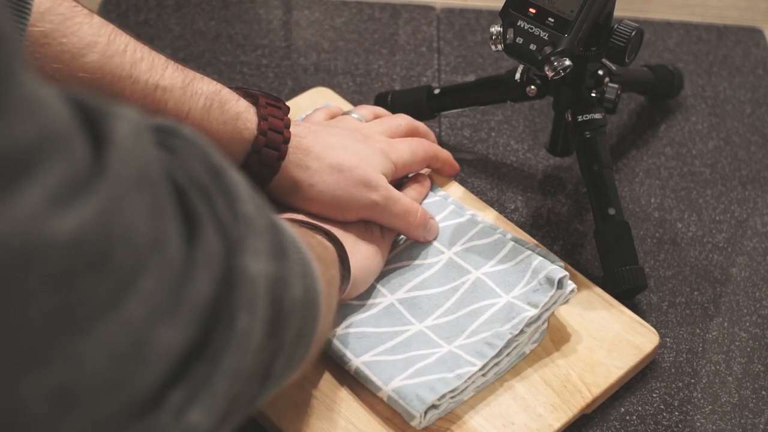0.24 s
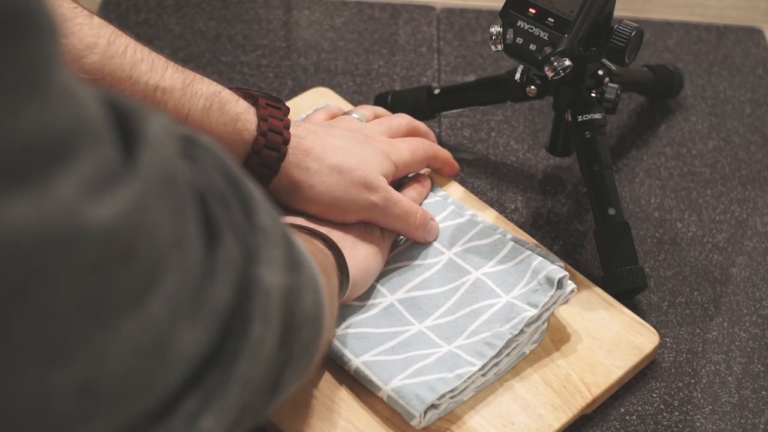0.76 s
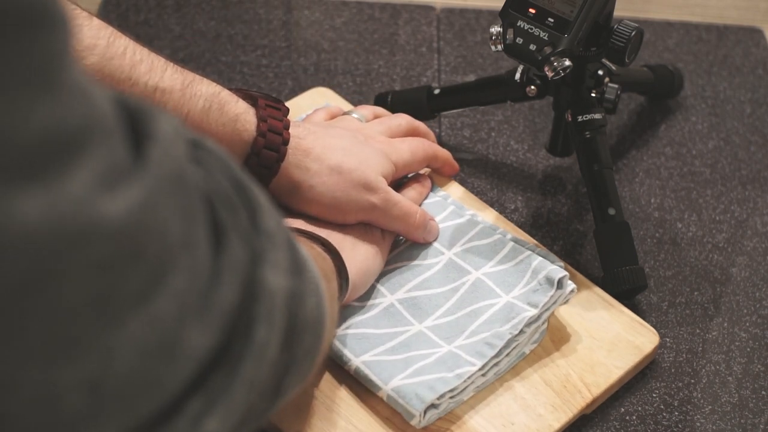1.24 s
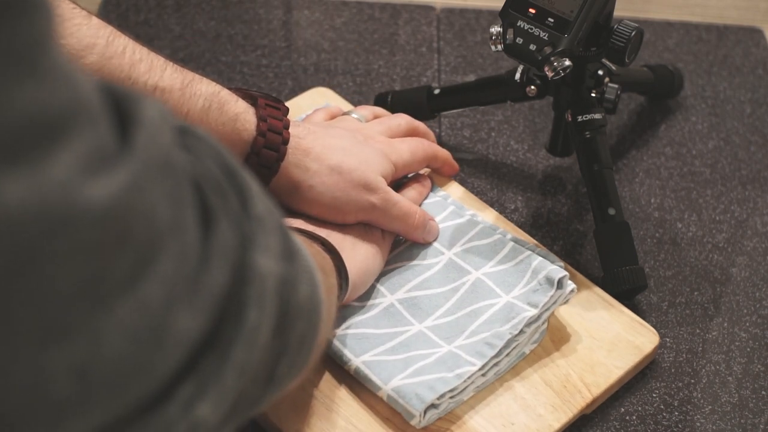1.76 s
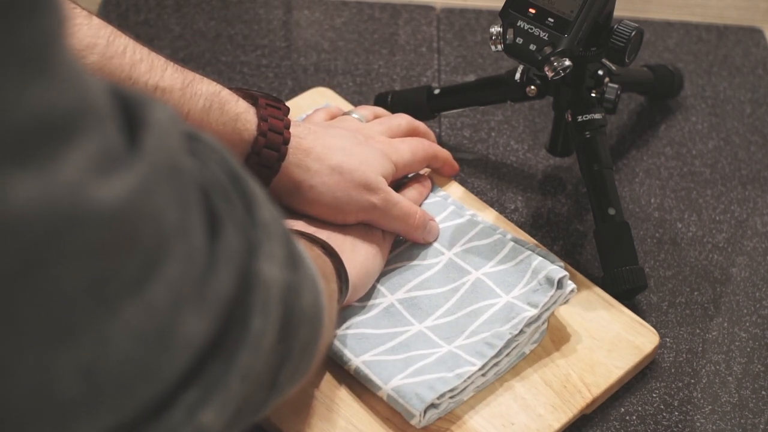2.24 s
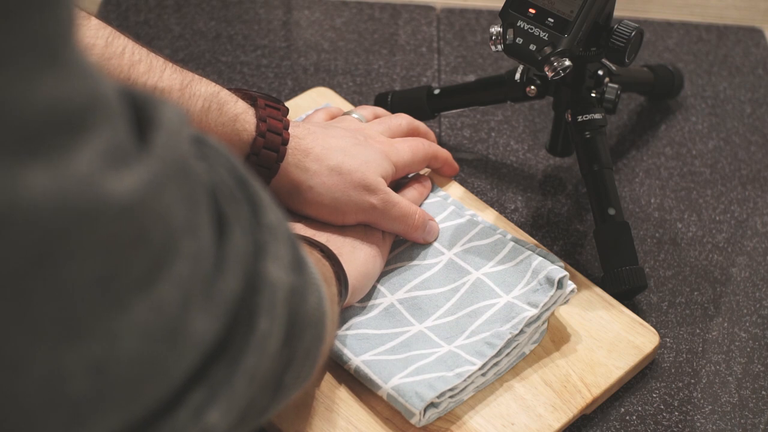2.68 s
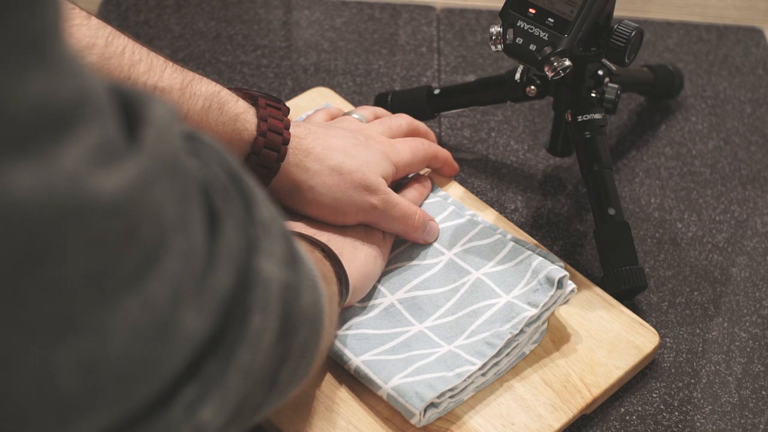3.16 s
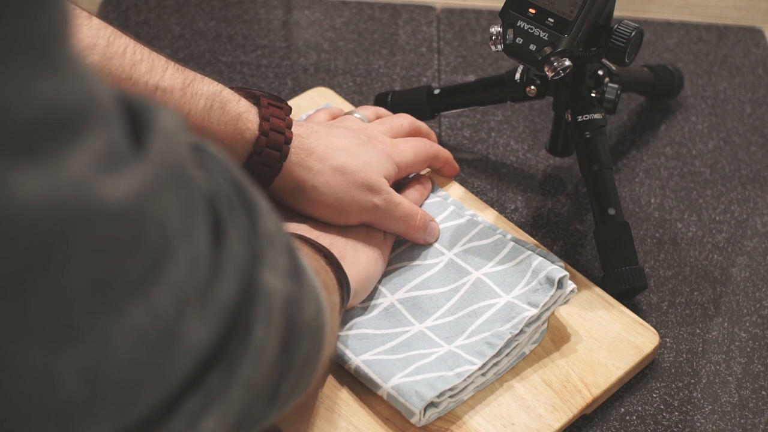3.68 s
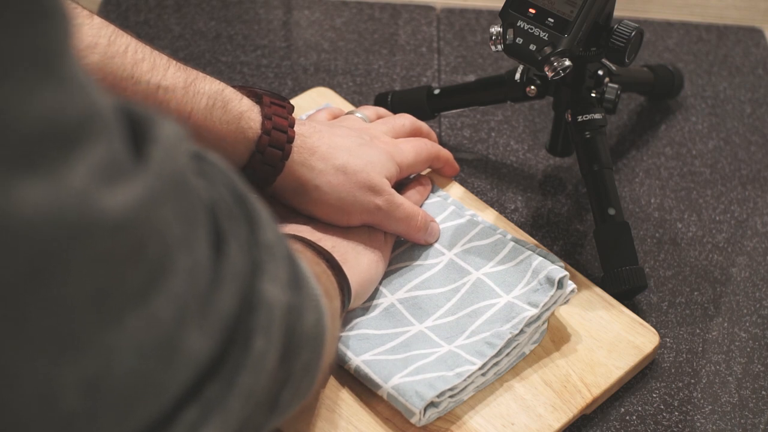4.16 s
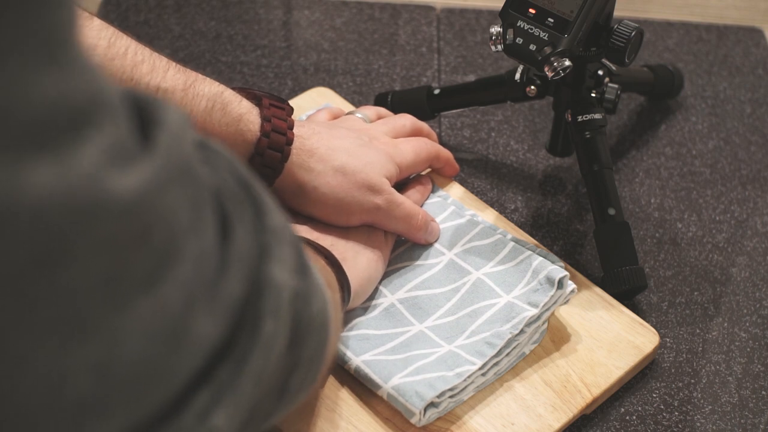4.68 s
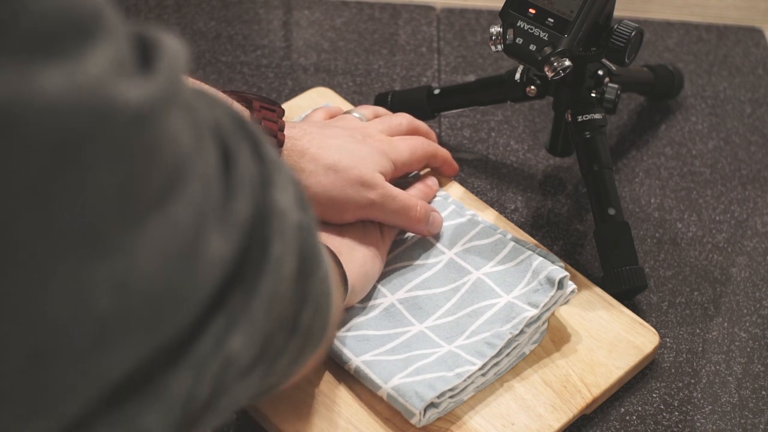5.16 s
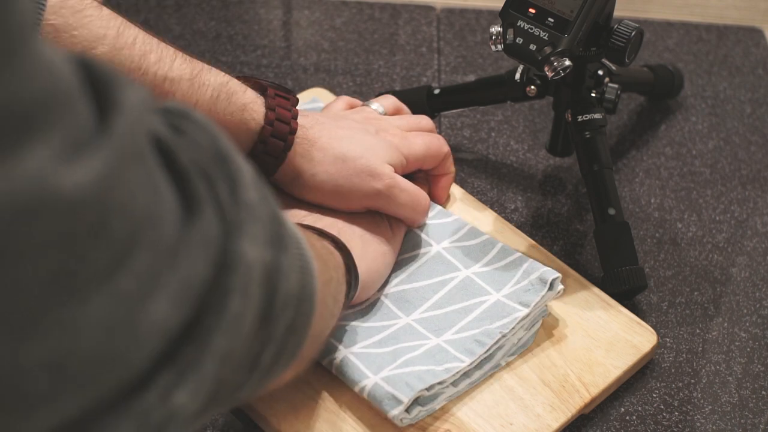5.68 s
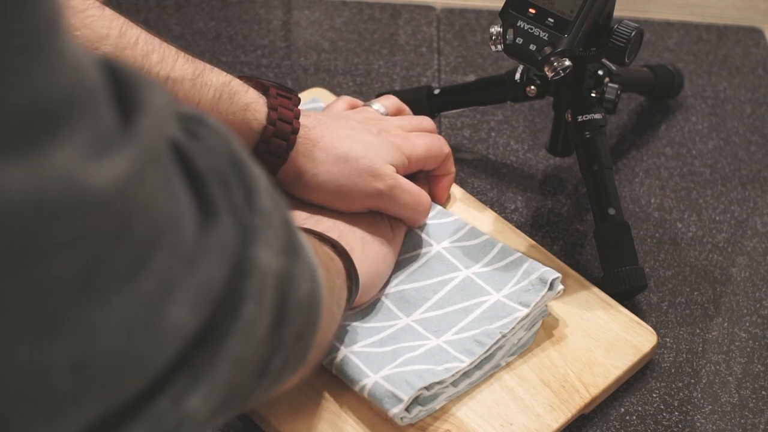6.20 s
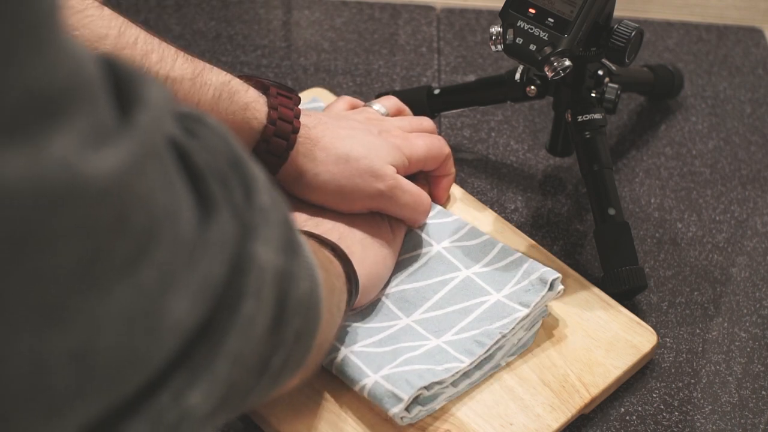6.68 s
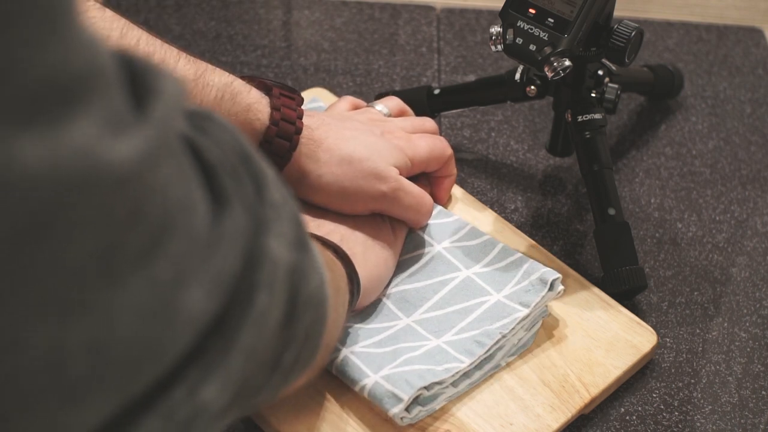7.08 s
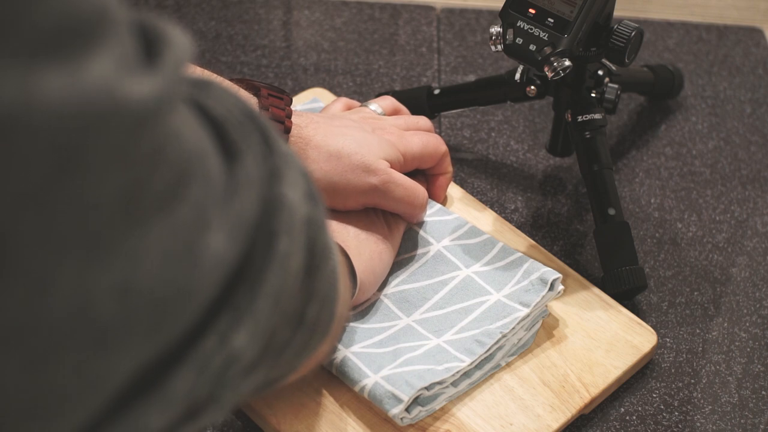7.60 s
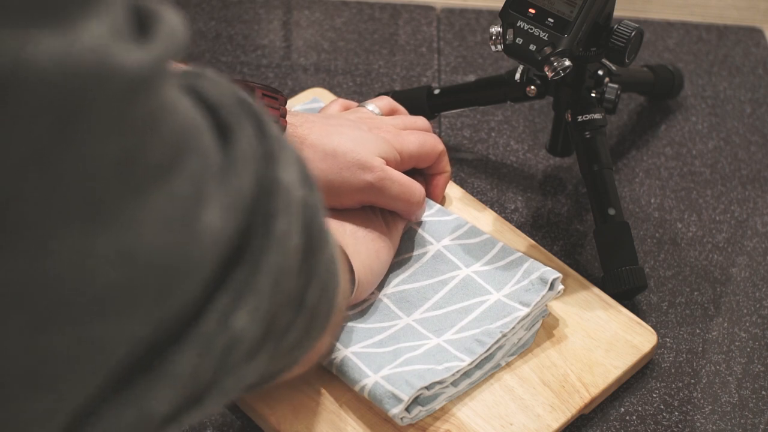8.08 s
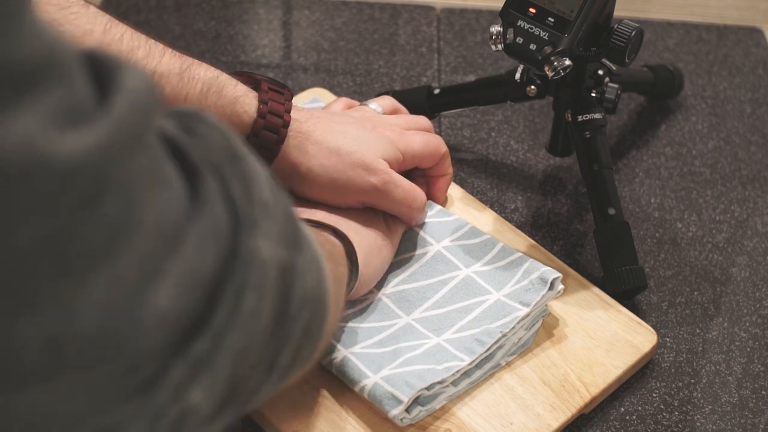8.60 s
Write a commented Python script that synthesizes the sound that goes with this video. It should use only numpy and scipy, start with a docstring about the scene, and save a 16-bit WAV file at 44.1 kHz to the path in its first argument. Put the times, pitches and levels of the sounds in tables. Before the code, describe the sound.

Close, brittle cracks of dry pasta breaking under hands on a wooden board, with dull thumps and faint cloth rustle.

```python
"""Dry pasta snapped in a towel

Two hands lean on a wooden board, close by, and break dry pasta inside a folded towel. Each break is a
sharp crack with ringing shards; the released hands knock the board and thump the table under it.
Between breaks the towel rustles and faint tones droop. A small room answers; rumble and hiss lie below."""
import sys
import numpy as np
from scipy import signal
from scipy.fft import rfft, irfft, next_fast_len
from scipy.io import wavfile
from scipy.ndimage import uniform_filter1d

SR = 44100
rng = np.random.default_rng(int(sys.argv[2]) if len(sys.argv) > 2 else 0)


def master_out(mix):
    """Clip the mix to full scale and print it as 16-bit PCM to the path in sys.argv[1]."""
    frames = np.transpose(np.atleast_2d(mix))
    ceiling = np.clip(frames, -1, 1)
    pcm = np.round(ceiling * 32767).astype(np.int16)
    wavfile.write(sys.argv[1], SR, pcm)


N = 390285
RING_SAMPLES, ATTACK_SAMPLES = int(0.6 * SR), int(0.01 * SR)
LEAN_S = 5.4  # the hands regrip and lean in for the second round

# Pasta breaks and one soft knock of a settling hand.
# Each row: start in seconds, crack, fizz and knock levels in dB before trim,
# knock hardness in dB per octave, ring of the piece in Hz, ring of the splinters in Hz.
IMPACTS = [(0.903, -33, -38, -38.5, 2.5, 2220, 7900), (0.9503, -36, -38.5, -40.5, 5, 4740, 7700),
           (0.972, -31, -39, -25.5, -3.5, 2240, 12300), (2.5167, -46, -42.5, -54, 7.5, 4740, 12200),
           (2.608, -31, -28, -14.5, -3.5, 1920, 12000), (3.5146, -54, -48.5, -69, 11.5, 5070, 12000),
           (3.7047, -32.5, -38, -33, 16.5, 1900, 10600), (3.72, -33, -42, -28, 8.5, 1900, 7500),
           (6.1916, -54.5, -49, -64.5, 10, 5050, 7500), (6.476, -27.5, -28, -19, 6.5, 2162, 10400),
           (6.6315, -43.5, -44.5, -43, 7, 4310, 10600), (6.7865, -74.5, -73.5, -61, -1.5, 1900, 8000),
           (7.0407, -24.5, -24, -17.5, 6, 2080, 11580), (7.0604, -25.5, -29.5, -20.5, 8, 2100, 11500),
           (7.0683, -32.5, -29.5, -16.5, 9.5, 1900, 11500), (7.2267, -48, -44, -63, 15, 3510, 11000),
           (7.347, -53.5, -49.5, -57, 12, 2090, 12900), (7.5432, -32.5, -36, -36.5, 10.5, 1985, 7600),
           (7.6312, -31, -33.5, -24, 4.5, 1860, 9200), (7.7231, -27, -27, -15.5, -5, 4560, 9740),
           (8.12, -76.5, -74, -69.5, 15, 2615, 7500)]


def undb(db):
    """Decibels to gain."""
    return 10 ** (np.asarray(db) / 20)


def unit(x, count=None):
    """Scale to rms 1 over the first count samples."""
    return x / np.sqrt(np.mean(x[:count] ** 2))


def colour(x, points):
    """Minimum-phase filter through (Hz, dB) points."""
    size = 2 * next_fast_len(len(x))
    hz, db = np.transpose(points)
    bin_hz = np.arange(size // 2 + 1) * SR / size
    gain = undb(np.interp(np.log(bin_hz + 1), np.log(hz), db))
    cepstrum = irfft(np.log(gain))
    cepstrum[1:size // 2] *= 2
    cepstrum[size // 2 + 1:] = 0
    return irfft(rfft(x, size) * np.exp(rfft(cepstrum)))[:len(x)]


def fade(t60_s, count=RING_SAMPLES):
    """Exponential decay, 60 dB down at t60_s."""
    return np.exp(-np.log(1000) * np.arange(count) / SR / t60_s)


def ring(modes, count=RING_SAMPLES):
    """Struck modes (Hz, dB, t60 s): the real part starts at full swing, the imaginary part at rest."""
    t = np.arange(count) / SR
    return sum(undb(db) * fade(t60_s, count) * np.exp(2j * np.pi * hz * t) for hz, db, t60_s in modes)


def walk(rate_hz):
    """Smooth random wander, rms 1."""
    hold = int(SR / rate_hz)
    steps = np.repeat(rng.standard_normal(N // hold + 1), hold)
    return unit(uniform_filter1d(uniform_filter1d(steps, hold), hold)[:N])


def ramp(start_s, rise_s):
    """Linear rise from 0 to 1."""
    return np.clip((np.arange(N) / SR - start_s) / rise_s, 0, 1)


def swell(start_s, attack_s, hold_s, release_s):
    """Linear envelope, released hold_s after its start."""
    return ramp(start_s, attack_s) * (1 - ramp(start_s + hold_s, release_s))


def add(track, start_s, sound):
    """Mix a sound into the track."""
    start = int(start_s * SR)
    track[start:start + len(sound)] += sound[:N - start]


def background(waver_db=2.5, hiss_db=-79, hiss_rise_db=3):
    """Table and room rumble under a white hiss that rises a little from LEAN_S on."""
    # Rumble spectrum. Each row: frequency in Hz, gain in dB.
    spectrum = [(12, -18.5), (22, -1), (48, 2.5), (78, -8.5), (115, -10.5), (160, -29), (205, -30),
                (250, -22), (330, -36.5), (430, -34.5), (700, -40), (2000, -48.5), (16000, -80)]
    # Rumble contour. Each row: time in seconds, level in dB.
    contour = [(0, -58.5), (2.3, -60), (3.2, -54.5), (3.6, -60), (4.7, -59), (7.2, -51), (8.85, -52.5)]
    rumble = unit(colour(rng.standard_normal(N), spectrum))
    rumble_db = np.interp(np.arange(N) / SR, *np.transpose(contour)) + waver_db * walk(8.2)
    hiss = undb(hiss_db + hiss_rise_db * ramp(LEAN_S, rise_s=0.28)) * rng.standard_normal(N)
    return undb(rumble_db) * rumble + hiss


def towel(rest_db=-94.5, grain_db=5, catch_db=2, crunches_per_s=12, over_rub_db=5.5, scatter_db=2.3):
    """Fibres catch and slip unevenly; now and then the pasta shifts with a short crunch."""
    # Cloth spectrum. Each row: frequency in Hz, gain in dB.
    spectrum = [(150, -11), (300, -2.5), (650, 4.5), (850, -7), (1150, 0.5), (1750, -4.5), (2800, -4.5),
                (3800, -8.5), (5000, -20), (16000, -30.5)]
    # Hands sliding on the towel. Each row: start in seconds, hold in seconds, level in dB.
    rubs = [(0.202, .12, -85), (4.96, 0.029, -77), (5.577, .7, -82), (6.891, .13, -87.5),
            (8.43, 0.46, -73.5)]
    # Clearest shifts of the pasta. Each row: start in seconds, level in dB.
    crunches = [(0.278, -67), (.331, -72.5), (.443, -70), (.563, -70), (0.589, -72), (.808, -72.5),
                (2.286, -69.5), (3.467, -70), (5.51, -69), (5.601, -69), (5.677, -70), (5.897, -70.5),
                (6.095, -65), (6.113, -64.5), (6.158, -68), (6.961, -67), (6.986, -66), (7.016, -66.5),
                (8.542, -68)]
    grains = rng.standard_normal(N) * undb(grain_db * rng.exponential(size=N).clip(0, 6))
    sliding = sum(undb(db) * swell(start_s, 0.018, hold_s, 0.13) for start_s, hold_s, db in rubs)
    friction = (undb(rest_db) + sliding) * undb(catch_db * walk(55))
    triggers = rng.random(N) < crunches_per_s / SR
    shifts = triggers * sliding * undb(over_rub_db + scatter_db * rng.standard_normal(N))
    for start_s, db in crunches:
        add(shifts, start_s, undb([db]))
    crunch_shape = swell(0, attack_s=0.0038, hold_s=0.0088, release_s=0.018)[:RING_SAMPLES]
    crunching = signal.fftconvolve(shifts, crunch_shape)[:N]
    return unit(colour(grains, spectrum)) * (friction + crunching)


def fracture(spectrum, ring_hz, ring_db, ring_q, tear_t60_s, splinter_t60_s, splinter_db,
             shard_t60_s, shard_count, shard_db=-5.5):
    """The crack tears through at once, splinters follow, and freed shards ring briefly in the cloth."""
    size = 8 * ATTACK_SAMPLES
    tear = rng.standard_normal(size) * fade(tear_t60_s, size)
    grains = rng.standard_normal(size) * undb(5 * rng.exponential(size=size).clip(0, 4))
    splinters = grains * fade(splinter_t60_s, size)
    shard_hz = rng.uniform(1800, 14000, (shard_count, 1))
    shard_tones = np.sin(2 * np.pi * shard_hz * np.arange(size) / SR)
    shards = rng.standard_normal(shard_count) @ shard_tones * fade(shard_t60_s, size)
    parts = ((tear, 0), (splinters, splinter_db), (shards, shard_db))
    burst = sum(undb(db) * unit(colour(part, spectrum), ATTACK_SAMPLES) for part, db in parts)
    # the size of the piece sets one well damped resonance
    resonance = signal.lfilter(*signal.iirpeak(ring_hz, ring_q, fs=SR), burst)
    return unit(burst + undb(ring_db) * resonance, ATTACK_SAMPLES)


def board_knock(hardness_db_per_octave, detune=0.022, scatter_db=3, contact_s=0.00026):
    """The broken piece is driven onto the board; hard contact favours the high modes."""
    # Board modes, damped by the hands. Each row: frequency in Hz, level in dB, t60 in seconds.
    board_modes = [(257, -17, 0.18), (337, -17, 0.076), (418.5, -18.5, 0.086), (557, -17.5, 0.059),
                   (716, 2.5, 0.032), (725, -10, 0.036), (1002, -9.5, 0.04), (1127, -11, 0.034),
                   (1212, -7.5, 0.028), (1420, -16.5, 0.026), (1680, -24, .03), (2103, -21, 0.05)]
    size = RING_SAMPLES // 4
    hz, db, t60_s = np.transpose(board_modes)
    octaves_up = np.clip(np.log2(hz / hz[np.argmax(db)]), 0, 1)
    struck_hz = hz * (1 + detune * rng.standard_normal(len(hz)))
    struck_db = db + hardness_db_per_octave * octaves_up + scatter_db * rng.standard_normal(len(hz))
    onset = 1 - np.exp(-np.arange(size) / SR / contact_s)
    return unit(ring(zip(struck_hz, struck_db, t60_s), size).imag * onset, ATTACK_SAMPLES)


def pasta(fizz_trim_db=-1.5, knock_trim_db=1):
    """Every break cracks, splinters and knocks the board, as heard from one direction."""
    # Spectra of the crack and the splinter fizz. Each row: frequency in Hz, gain in dB.
    crack_spectrum = [(300, -26), (900, -5.5), (1600, -3), (2140, -3.5), (2700, -2.5), (4200, -3),
                      (5500, -4), (6700, -7.5), (8000, -17), (16000, -37.5)]
    fizz_spectrum = [(1000, -36.5), (5500, -15.5), (7500, -2.5), (9500, -3), (12200, -1.5), (14000, -5),
                     (16000, -14.5)]
    out = np.zeros(N)
    for start_s, crack_db, fizz_db, knock_db, hardness, piece_hz, splinter_hz in IMPACTS:
        crack = fracture(crack_spectrum, piece_hz, ring_db=-0.5, ring_q=3.2, tear_t60_s=0.0052,
                         splinter_t60_s=0.049, splinter_db=5.5, shard_t60_s=0.028, shard_count=32)
        fizz = fracture(fizz_spectrum, splinter_hz, ring_db=1.5, ring_q=7, tear_t60_s=0.0025,
                        splinter_t60_s=0.037, splinter_db=3, shard_t60_s=0.025, shard_count=24)
        add(out, start_s, undb(crack_db) * crack)
        add(out, start_s, undb(fizz_db + fizz_trim_db) * fizz)
        add(out, start_s, undb(knock_db + knock_trim_db) * board_knock(hardness))
    return out


def thump(scatter_db=2.5, contact_s=0.003):
    """The weight of the hands shakes the table; flesh and towel soften the blow."""
    # Table top modes. Each row: frequency in Hz, level in dB, t60 in seconds.
    table_modes = [(50.1, -4, 0.38), (57.4, -9.5, 0.39), (76.6, 3, 0.14), (87.8, -9.5, .3),
                   (108.6, -11, 0.35), (135, -12, .3), (186.6, -27.5, 0.46), (247.5, -13.5, .16),
                   (264.6, -12.5, 0.12)]
    modes = [(hz, db + scatter_db * rng.standard_normal(), t60_s) for hz, db, t60_s in table_modes]
    onset = 1 - np.exp(-np.arange(RING_SAMPLES) / SR / contact_s)
    return unit(ring(modes).real * onset, 3 * ATTACK_SAMPLES)


def table_thumps(offset_db=-2.5, follow_db_per_db=0.27, lean_db=-4.5):
    """Each impact thumps the table: more when the hands follow through, less once they lean on it."""
    # Soft table thumps as the hands shift their weight. Each row: start in seconds, level in dB.
    bumps = [(2.3, -60), (3.1, -52), (6.787, -47), (7.971, -57)]
    out = np.zeros(N)
    for start_s, crack_db, _, knock_db, *_ in IMPACTS:
        follow_db = follow_db_per_db * (knock_db - crack_db)
        thump_db = knock_db + offset_db + follow_db + lean_db * (start_s > LEAN_S)
        add(out, start_s, undb(thump_db) * thump())
    for start_s, db in bumps:
        add(out, start_s, undb(db) * thump())
    return out


def whines(droop=0.04, waver=0.008, flutter_db=2):
    """Faint tones that swell quickly, waver and sink a little as they fade."""
    # Hums and whines. Each row: start in seconds, length in seconds, pitch in Hz, level in dB.
    tones = [(1.301, 0.32, 250.4, -76), (3.07, 0.12, 419, -76), (3.102, 0.28, 251.8, -67.5),
             (5.079, 0.59, 726.6, -83.5), (5.181, 0.31, 522, -72), (8.329, 0.36, 533, -77)]
    out, wander, flutter = np.zeros(N), walk(63), walk(45)
    for start_s, length_s, hz, db in tones:
        start, count = int(start_s * SR), int(length_s * SR)
        age = np.linspace(0, 1, count)
        pitch_hz = hz * (1 - droop * age + waver * wander[start:start + count])
        envelope = np.sin(np.pi * np.sqrt(age)) * undb(db + flutter_db * flutter[start:start + count])
        add(out, start_s, np.sqrt(2) * envelope * np.sin(2 * np.pi * np.cumsum(pitch_hz) / SR))
    return out


def room(x, gap_s=0.0005, build_s=0.003):
    """Diffuse echoes of a small room; the treble dies first."""
    # Echo bands. Each row: frequency in Hz, level in dB.
    bands = [(100, -18), (250, -9.5), (450, -4.5), (600, -9), (720, -14), (920, -5), (1220, -8), (1550, -6),
             (2100, -9), (4000, -9.5), (8000, -10), (12000, -13), (16000, -10.5)]
    # Echo decay. Each row: frequency in Hz, t60 in seconds.
    decay = [(100, .34), (700, .36), (1400, .36), (2500, .33), (6000, .3), (11000, .22), (16000, .15)]
    hz, db = np.transpose(bands)
    t60_s = np.interp(hz, *np.transpose(decay))
    noise = rfft(rng.standard_normal(RING_SAMPLES))
    log_bin_hz = np.log(np.arange(len(noise)) * SR / RING_SAMPLES + 1)
    arrival = ramp(gap_s, build_s)[:RING_SAMPLES]
    response = np.zeros(RING_SAMPLES)
    for band, band_db, band_t60_s in zip(np.eye(len(hz)), db, t60_s):
        echoes = irfft(noise * np.interp(log_bin_hz, np.log(hz), band), RING_SAMPLES)
        envelope = arrival * fade(band_t60_s)
        response += undb(band_db) * echoes * envelope / np.linalg.norm(envelope)
    return signal.fftconvolve(x, response)[:N]


def scene():
    """Close sounds, their echoes and the background, in mono."""
    near = pasta() + table_thumps() + towel() + whines()
    # a break sends a different fine pattern in each direction, so its echoes blend into a smooth tail
    directions = [near, pasta(), pasta()]
    echoes = sum(room(sound) for sound in directions) / np.sqrt(len(directions))
    return (near + echoes + background())[None]


def record(dry, low_hz=24, top_hz=15900):
    """Gentle low cut, steep top cut."""
    low_cut = signal.butter(2, low_hz, "high", fs=SR, output="sos")
    top_cut = signal.ellip(8, 0.2, 70, top_hz, fs=SR, output="sos")
    return signal.sosfilt(top_cut, signal.sosfilt(low_cut, dry))


dry = scene()
out = record(dry)
master_out(out)
```